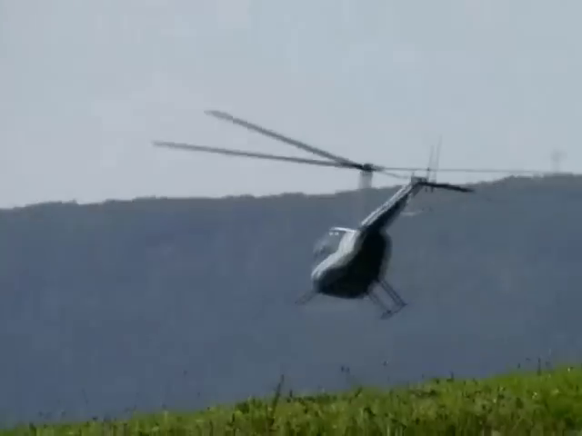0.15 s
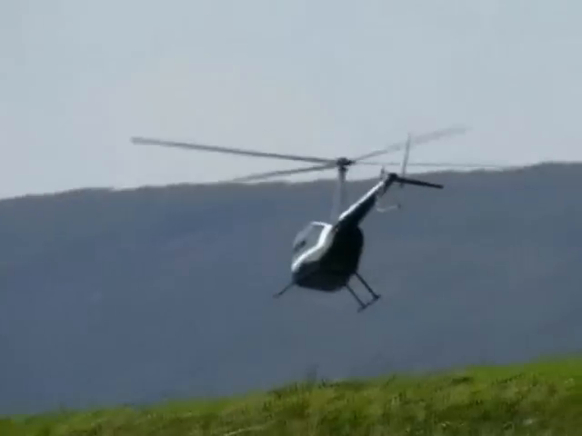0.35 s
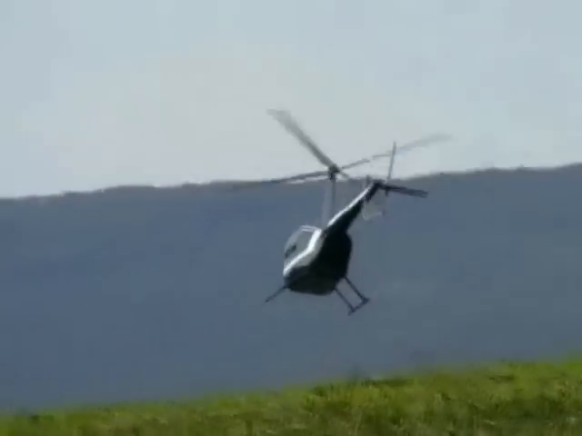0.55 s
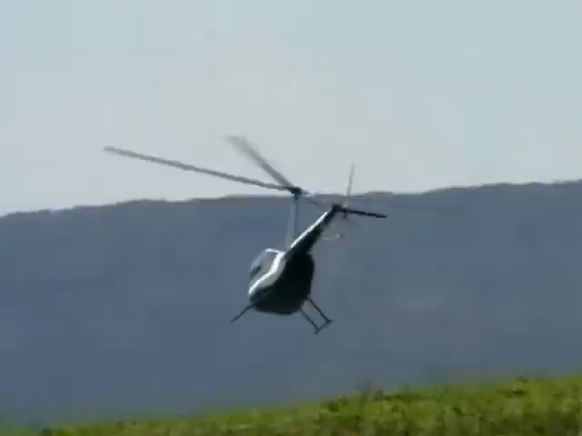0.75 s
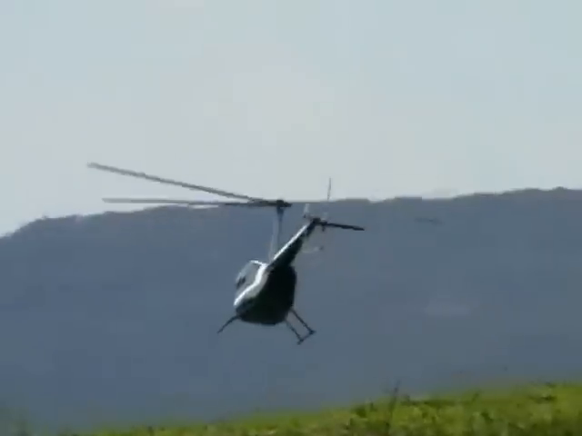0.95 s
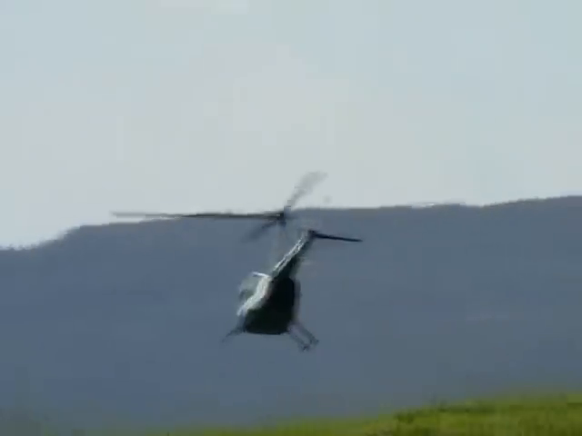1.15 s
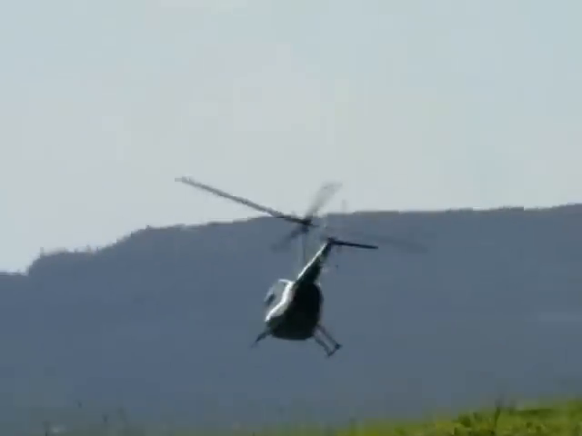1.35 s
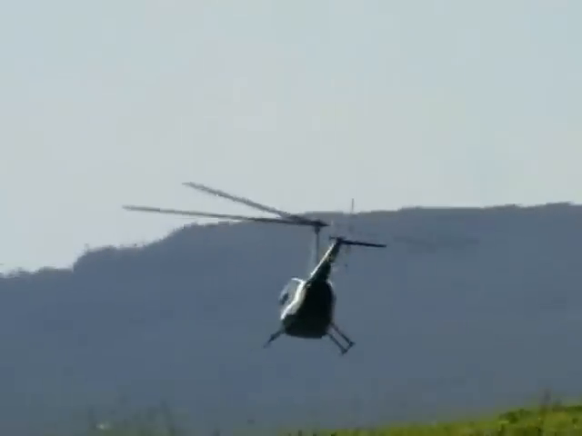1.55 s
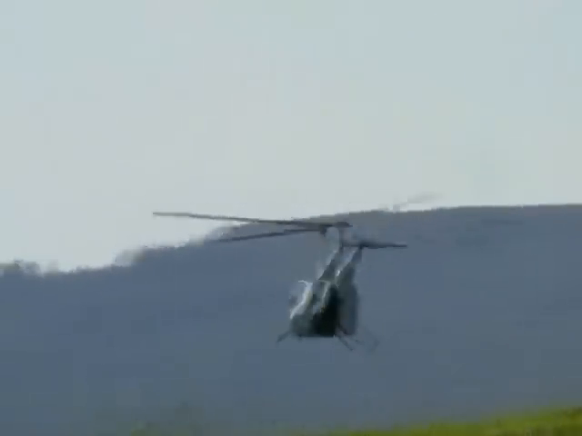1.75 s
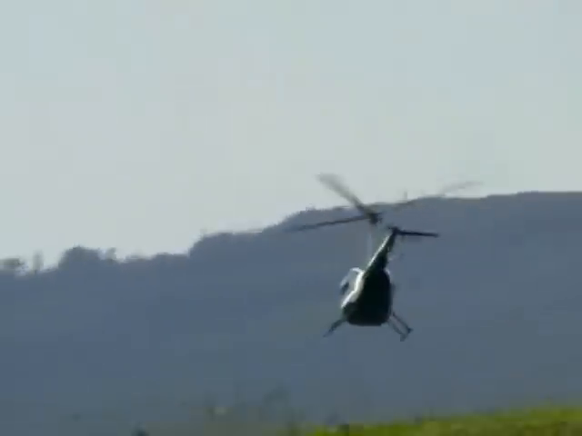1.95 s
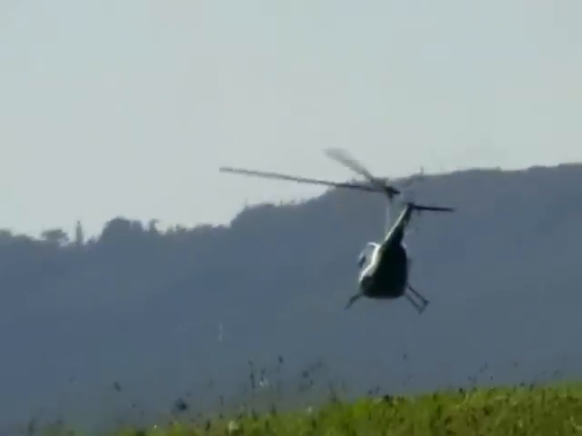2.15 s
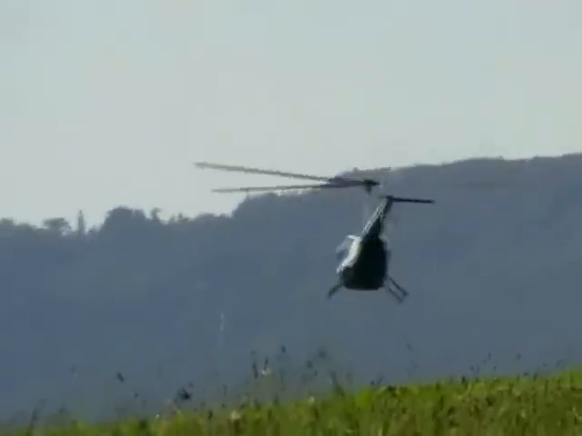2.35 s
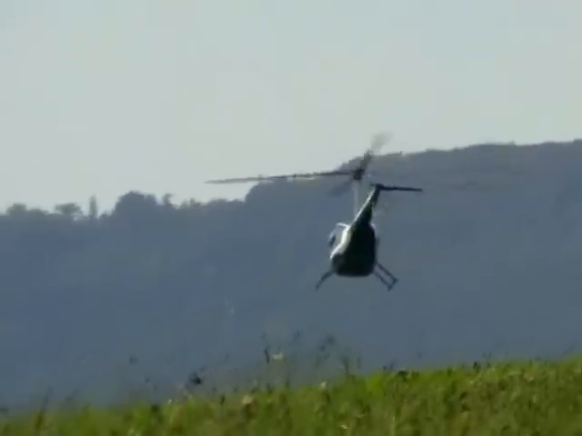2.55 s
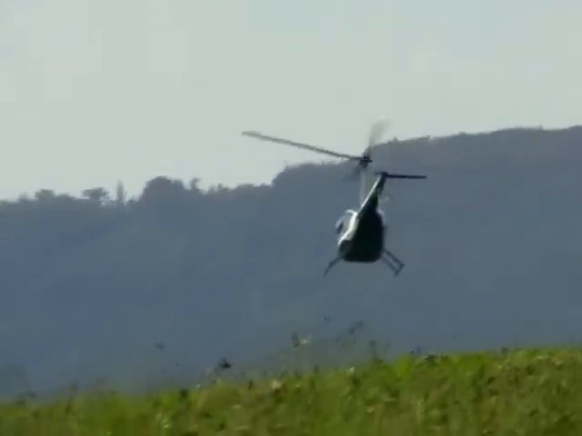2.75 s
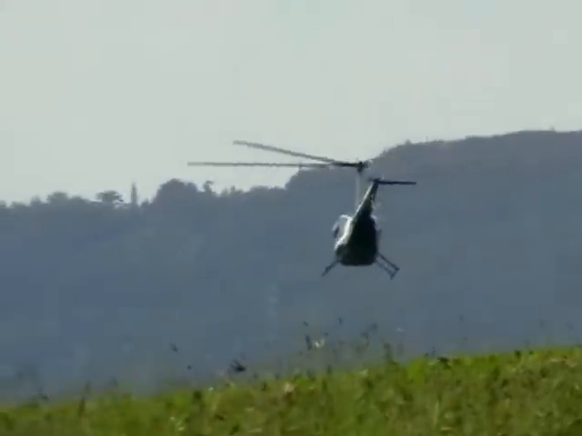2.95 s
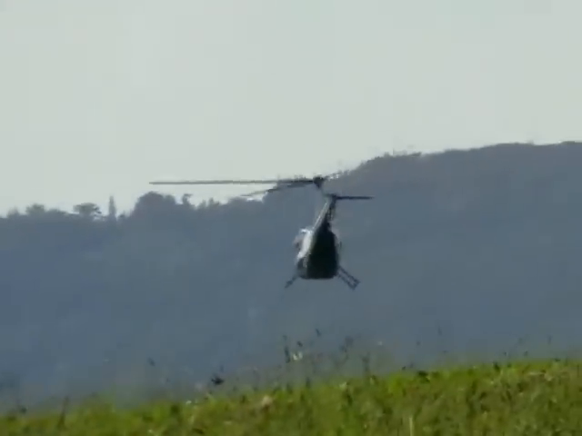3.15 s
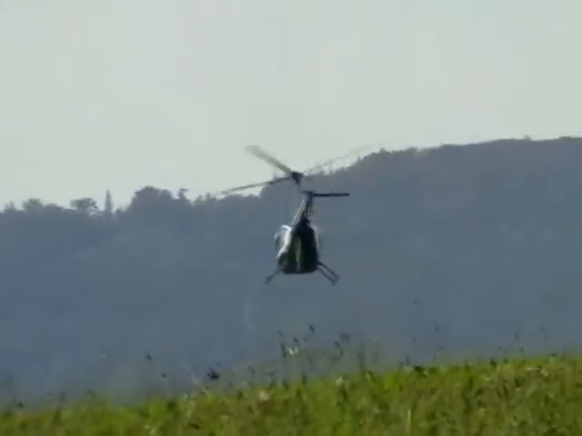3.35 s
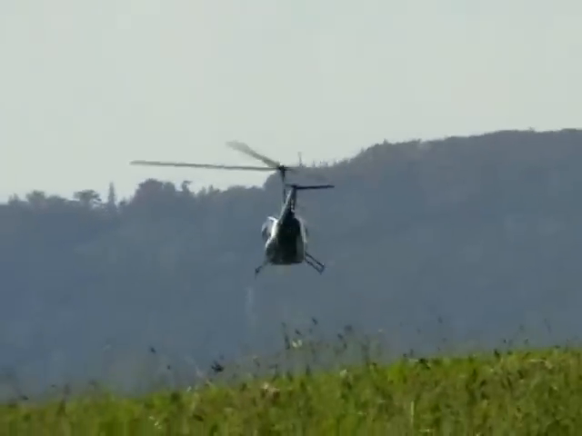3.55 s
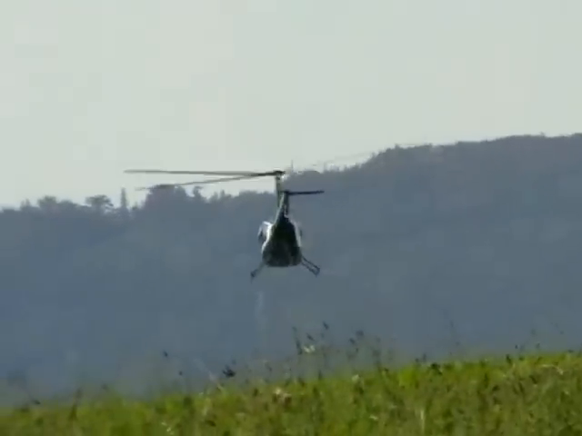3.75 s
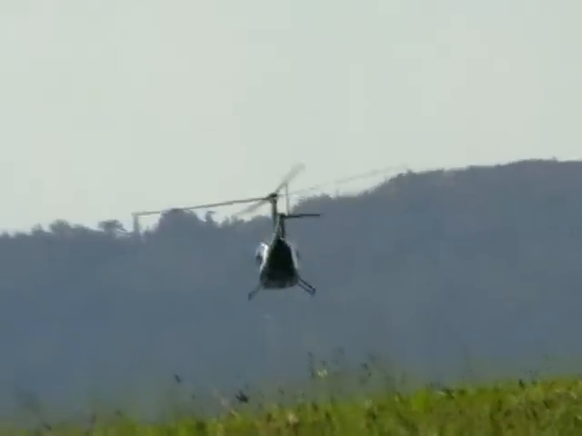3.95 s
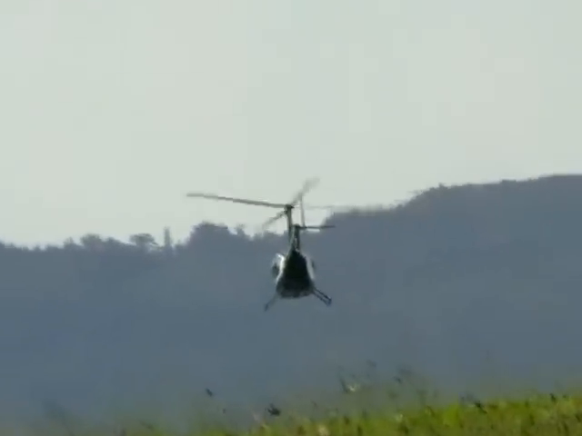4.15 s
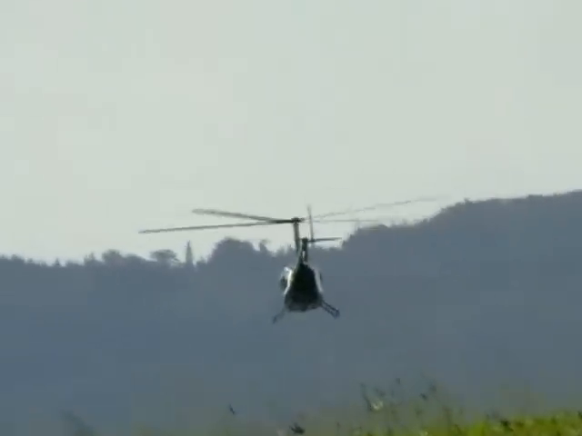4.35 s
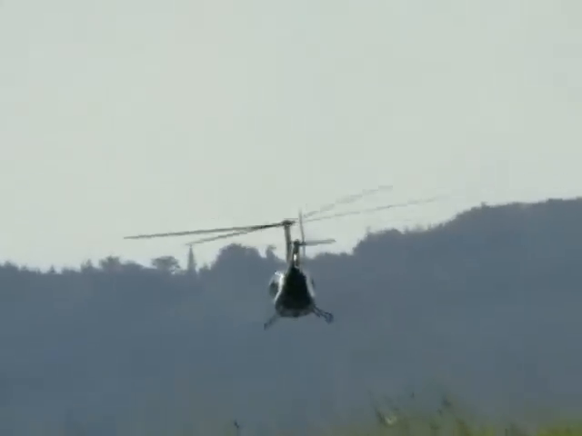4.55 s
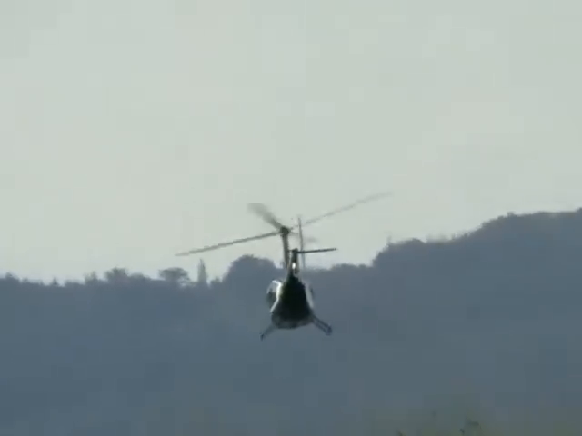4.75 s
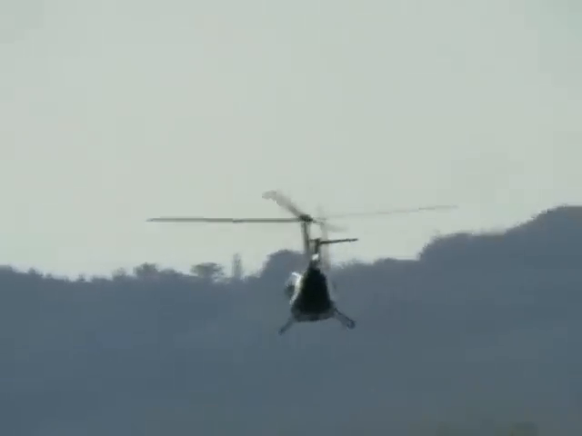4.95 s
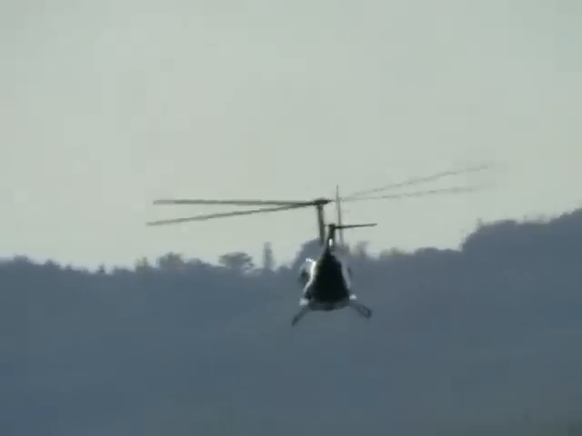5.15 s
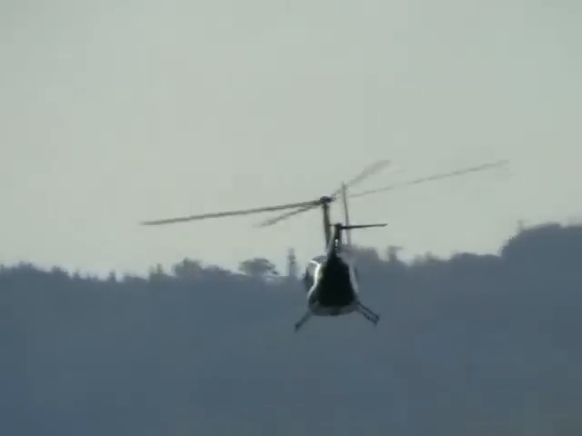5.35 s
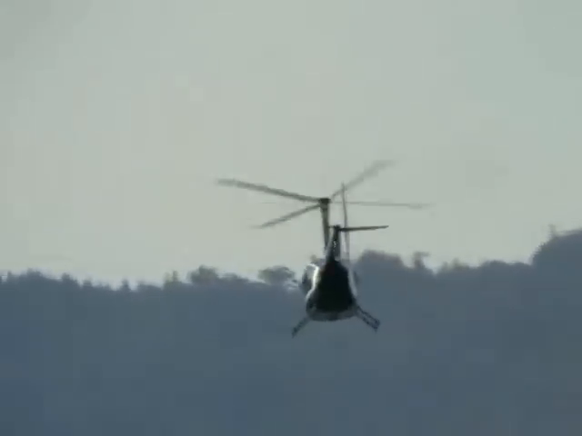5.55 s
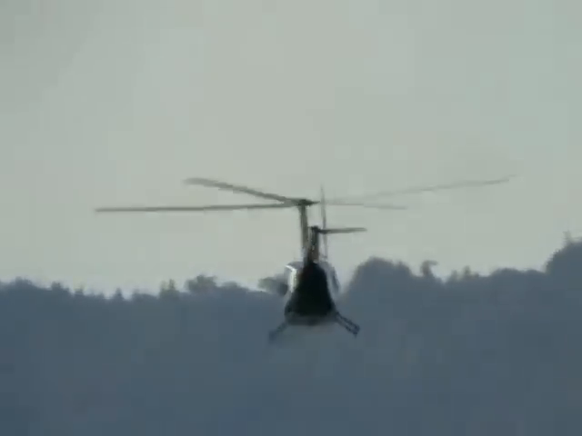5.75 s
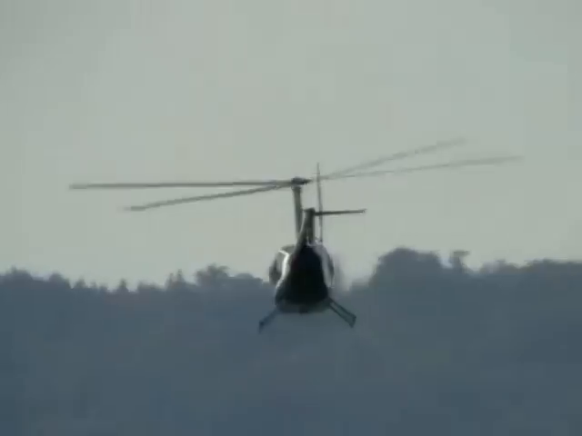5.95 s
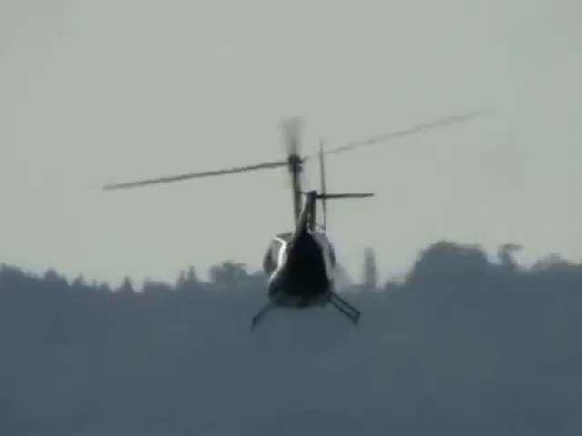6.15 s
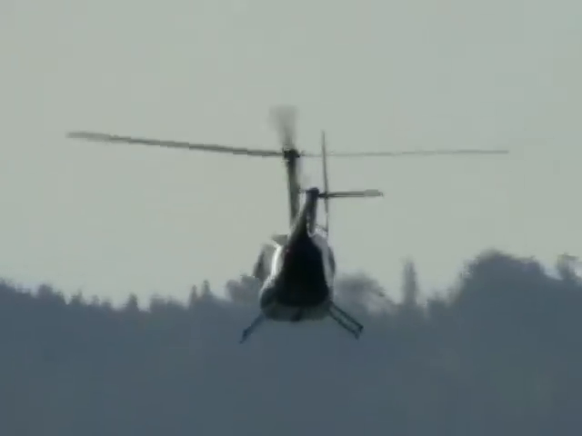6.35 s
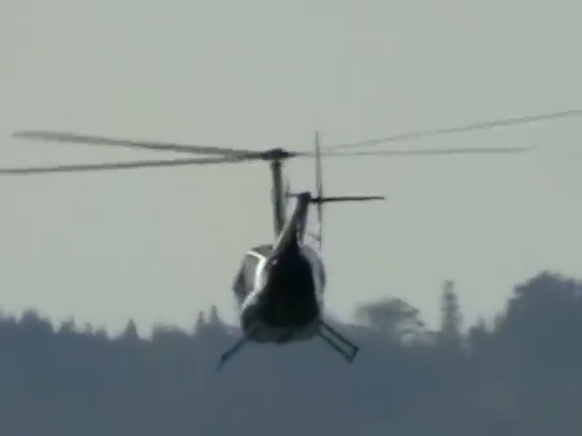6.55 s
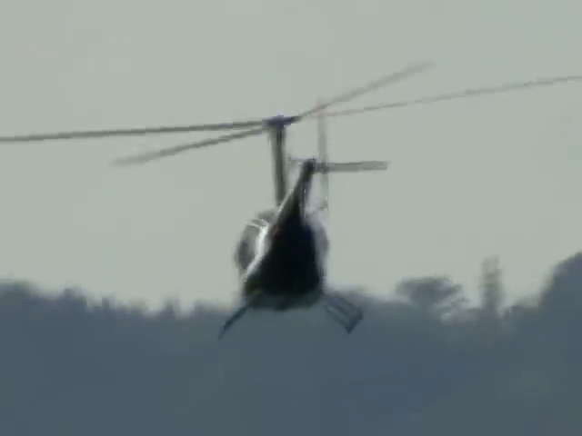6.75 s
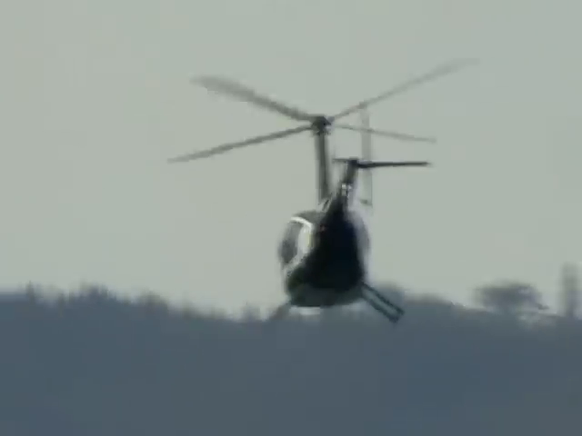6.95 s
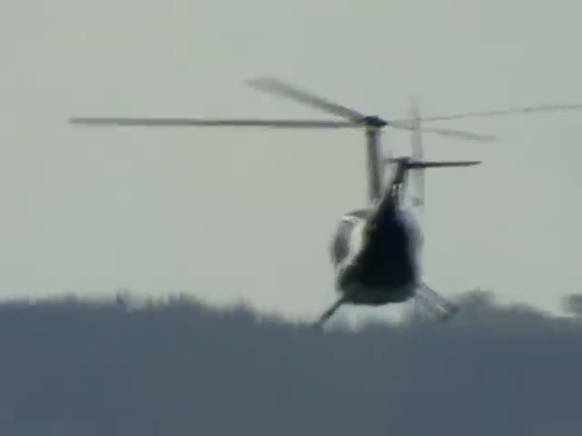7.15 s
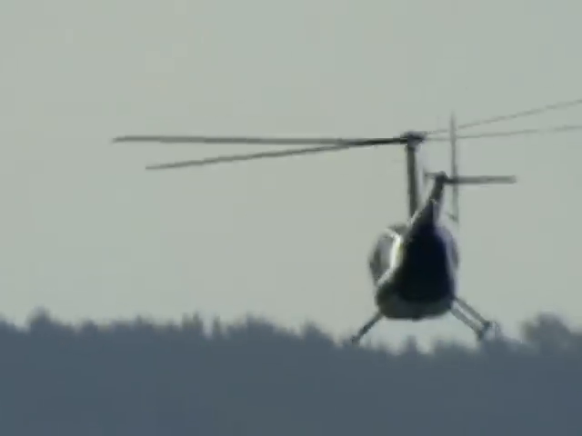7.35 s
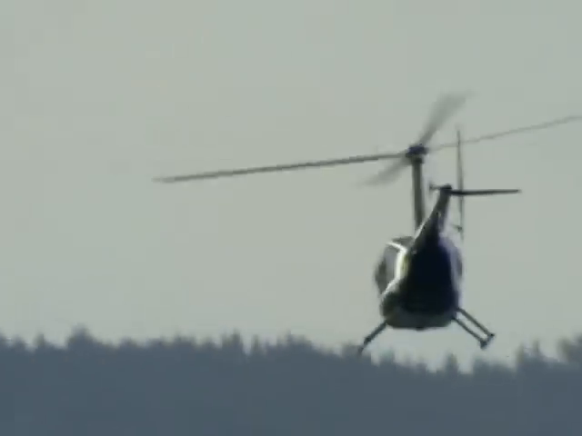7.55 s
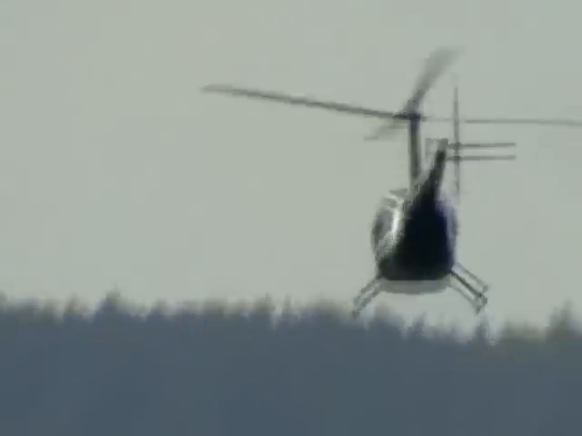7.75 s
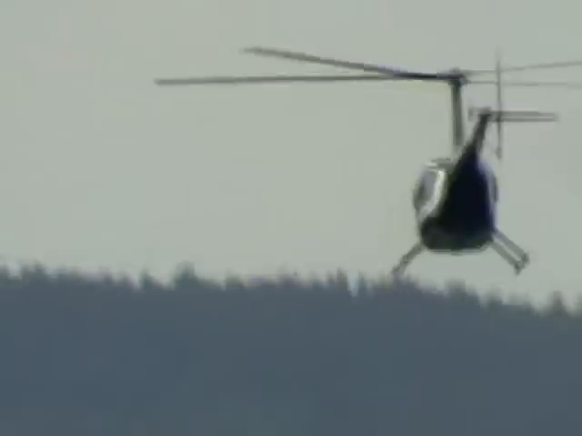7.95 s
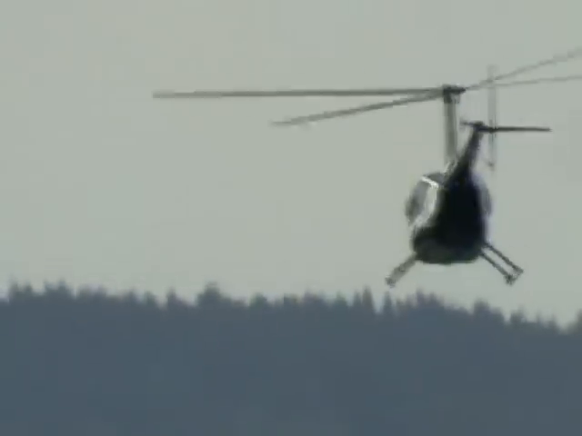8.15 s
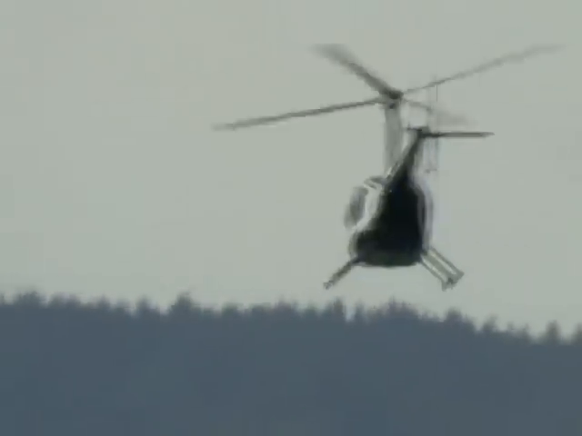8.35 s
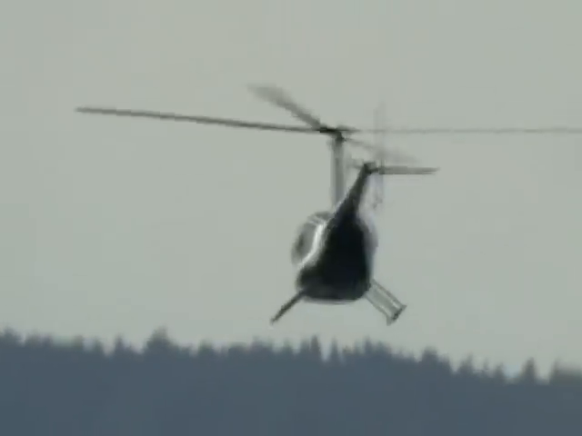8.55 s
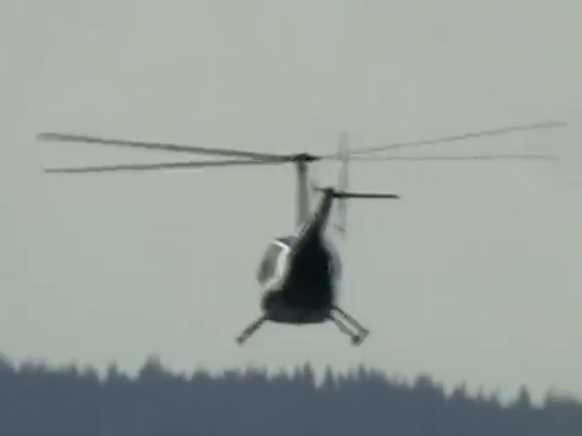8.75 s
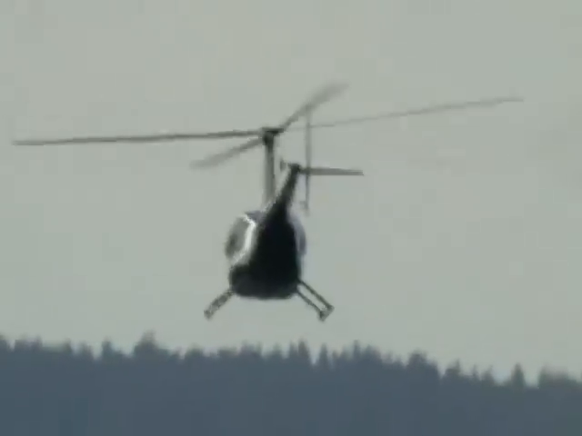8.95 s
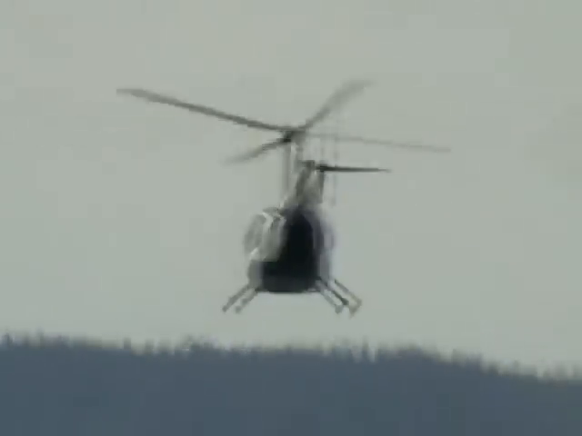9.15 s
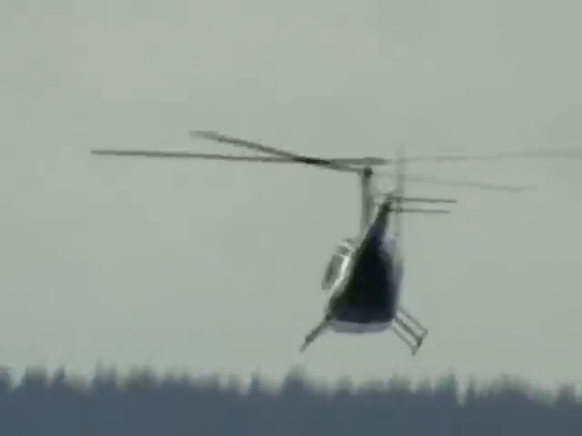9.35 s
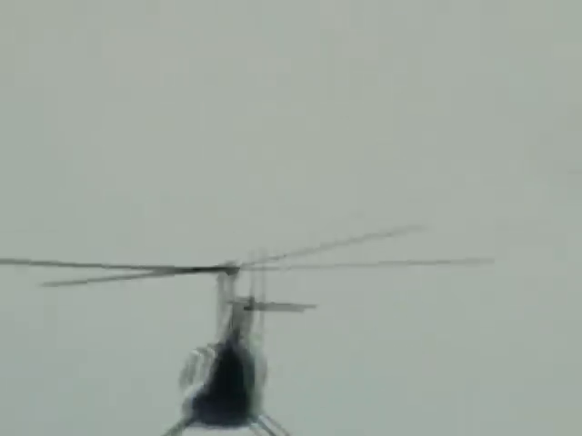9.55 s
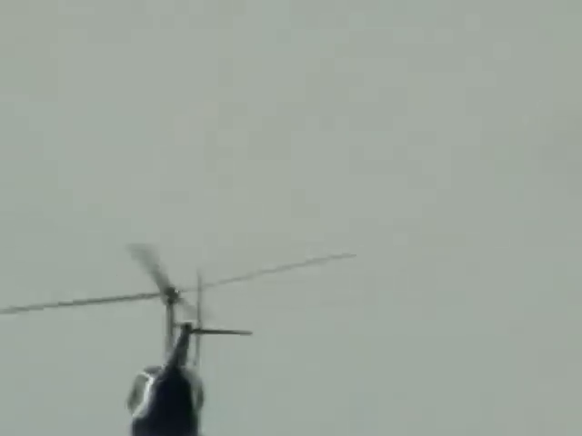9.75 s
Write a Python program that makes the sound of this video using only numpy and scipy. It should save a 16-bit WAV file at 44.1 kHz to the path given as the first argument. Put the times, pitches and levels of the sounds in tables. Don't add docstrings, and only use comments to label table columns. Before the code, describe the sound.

A small piston helicopter drones away low over a summer meadow, its throbbing, crackling exhaust hiss fading while grasshoppers buzz and rasp nearby.

```python
import sys
import numpy as np
from scipy import signal
from scipy.fft import rfft, irfft, next_fast_len
from scipy.io import wavfile
from scipy.ndimage import map_coordinates

SR = 44100
rng = np.random.default_rng(int(sys.argv[2]) if len(sys.argv) > 2 else 0)


def invert_db(x):
    u = np.asarray(x, float) / 20
    return 10 ** u


def unload_audio(sound):
    columns = np.transpose(np.atleast_2d(sound))
    steps = np.round(np.clip(columns, -1, 1) * 32767)
    wavfile.write(sys.argv[1], SR, steps.astype(np.int16))


N = 436575
TIME = np.arange(N) / SR


def in_time(rows):
    s, *columns = np.transpose(rows)
    return [np.interp(TIME, s, c) for c in columns]


def rms_one(x):
    return x / np.sqrt(np.mean(x ** 2) + 1e-20)


def band(x, low_hz, high_hz, order=2):
    edges_hz = [low_hz, min(high_hz, .45 * SR)]
    return signal.sosfilt(signal.butter(order, edges_hz, "band", fs=SR, output="sos"), x)


def band_noise(low_hz, high_hz):
    return rms_one(band(rng.standard_normal(N), low_hz, high_hz))


def coloured(spectrum):
    hz, level_db = np.transpose(spectrum)
    size = next_fast_len(N)
    log_hz = np.log(np.arange(size // 2 + 1) * SR / size + 1)
    shape = invert_db(np.interp(log_hz, np.log(hz), level_db, left=-80, right=-80))
    return rms_one(irfft(rfft(rng.standard_normal(size)) * shape, size)[:N])


def drift(points_per_s):
    points = rng.standard_normal(1200)
    return map_coordinates(points, [TIME * points_per_s], order=3, mode="wrap")


def resonate(x, modes):
    out = 0
    for k, (hz, width_hz, level_db) in enumerate(modes):
        r = np.exp(-np.pi * width_hz / SR)
        poles = [1, -2 * r * np.cos(2 * np.pi * hz / SR), r * r]
        zeros = [(1 - r * r) / 2, 0, (r * r - 1) / 2]
        out = out + (-1) ** k * invert_db(level_db) * signal.lfilter(zeros, poles, x)
    return out


def throb(turns, sharp, uneven_db):
    sizes = invert_db(uneven_db * rng.standard_normal(2000))
    size = sizes[np.floor(turns + .5).astype(int) % len(sizes)]
    return size * np.exp(sharp * (np.cos(2 * np.pi * turns) - 1))


def bursts(events, rise_s, fall_s):
    out = np.zeros(N)
    for s, peak_db in events:
        span = slice(int(s * SR), int((s + .1) * SR))
        t = np.clip(TIME[span] - s, 0, None)
        out[span] += invert_db(peak_db) * (1 - np.exp(-t / rise_s)) * np.exp(-t / fall_s)
    return out


# multiple of the engine cycle, dB re the drone when far, dB gained per dB of nearness.
MAIN_ORDERS = [(6, -0.5, 1.0), (9, -2.5, 0.93), (12, -1, 1.24)]
# multiple of the engine cycle, level in dB re the
WEAK_ORDERS_DB = [(3, -28), (4, -34), (7.12, -15), (8, -44), (10, -8.5), (11, -15), (13, -24), (14, -18),
                  (15, -19.5), (16, -28.5), (18, -29), (19, -23.5), (21, -26), (24, -30.5)]
# multiple of the engine cycle, level in dB re the low rush band.
PIPE_ORDERS_DB = [(30, -21), (33, -17), (36, -17), (39, -10), (47, -21), (51, -21)]


def drone(cycles, levels_db, pipe_db):
    mean_db = sum(levels_db) / 3
    orders = [(row[0], level_db) for row, level_db in zip(MAIN_ORDERS, levels_db)]
    orders += [(k, mean_db + 2.5 + level_db) for k, level_db in WEAK_ORDERS_DB]
    orders += [(k, pipe_db + level_db) for k, level_db in PIPE_ORDERS_DB]
    out = 0
    for k, level_db in orders:
        flip = np.pi * (k % 3) * (k // 3)
        pipe_delay = .85 * (k // 3) ** 2
        phase = 2 * np.pi * k * cycles + flip + pipe_delay + .014 * k * drift(5.0)
        out = out + np.sqrt(2) * invert_db(level_db + .06 * k * drift(8.0)) * np.sin(phase)
    return out


# frequency in Hz, level in dB per Hz.
WASH_COLOUR = [(25, -9), (50, -6), (75, 5), (110, 6), (200, 10), (290, 6.5), (350, 4), (700, -4)]


def rotor_wash(drone_db):
    return invert_db(0.61 * (drone_db + 58.5) - 63.0) * coloured(WASH_COLOUR)


RUSH_EDGES_HZ = [520, 1200, 1680, 2480, 5000]
# frequency in Hz, width in Hz, level in dB.
RUSH_MODES = [
    [(667, 145, -1.5), (848, 112, 0), (1035, 142, -2)],
    [(1405, 180, 0)],
    [(1653, 165, 5.5), (2167, 420, 3.5)],
    [(2823, 290, 2.5), (3590, 134, -2), (4060, 280, -5), (4750, 74, -22)],
]
# start in seconds, peak in dB.
BACKFIRES = [(0.0338, -29), (0.0972, -33), (0.2603, -31), (0.3521, -33), (0.399, -32), (0.4469, -30),
             (0.5132, -34), (0.7193, -31), (0.8639, -31), (0.8964, -27), (0.9120, -25), (1.039, -31),
             (1.0884, -30), (1.1672, -33), (1.2486, -32), (1.5204, -35), (1.7619, -36), (1.8113, -36),
             (1.8577, -37), (2.0023, -35), (2.1465, -38), (3.5508, -40), (3.9399, -33), (4.0362, -37),
             (6.8192, -34), (7.0454, -39), (7.3372, -34), (7.434, -39), (7.6301, -37)]
# start in seconds, peak in dB.
SLAPS = [(0.2909, -28), (0.3744, -27), (0.4519, -27), (0.5399, -27), (0.615, -26), (0.698, -29),
         (0.7675, -28), (0.8175, -26), (1.1051, -26), (1.2975, -29), (1.4416, -31.5)]


def rush(cycles, bands_db):
    near_bank = throb(3 * cycles, sharp=3.0, uneven_db=2.5)
    both_banks = throb(6 * cycles, sharp=1.5, uneven_db=3.0)
    puffs = .45 + 1.1 * near_bank + .25 * both_banks
    blades = invert_db(1.0 * np.cos(2 * np.pi * 0.53 * cycles) + 0.2 * drift(6.0))
    white = rng.standard_normal((2, N))
    gate_depths = [0.18, 0.33, 0.56, 0.57]
    out = 0
    for k, level_db in enumerate(bands_db):
        gate = (puffs * blades) ** gate_depths[k] * invert_db(1.08 * drift(12.0))
        rung = resonate(gate * white[k % 2], RUSH_MODES[k])
        out = out + invert_db(level_db + 1.5) * rms_one(band(rung, *RUSH_EDGES_HZ[k:k + 2], order=1))
    pipe_tone = np.sin(2 * np.pi * np.cumsum(2050 + 90.0 * drift(30.0)) / SR)
    pipe = pipe_tone + .3 * rms_one(band(white[1], 1700, 2450))
    out += invert_db(5.5) * bursts(BACKFIRES, rise_s=.0004, fall_s=.003) * pipe
    slap = resonate(white[0], RUSH_MODES[3][1:3]) + 0.34 * band(white[1], 2000, 4000)
    return out + invert_db(-3.5) * bursts(SLAPS, rise_s=0.002, fall_s=0.007) * rms_one(slap)


def ground(x):
    echo_s, echo_share = 0.001423, 0.16
    return x + echo_share * np.interp(TIME - echo_s, TIME, x)


# time in seconds, rate in Hz.
FIRING_HZ = [(0, 125.25), (1.1, 124.87), (2.3, 124.42), (2.9, 124.0), (3.5, 123.6), (4.9, 123.75),
             (6.5, 123.45), (8.0, 123.3), (9.9, 123.1)]
# time in seconds, drone in dB, rush in dB, brightness in dB as exhaust and wind turn to the ear.
FLIGHT = [(0.0, -44, -41, 2.5), (0.35, -44, -43, -1), (0.62, -44.5, -41, -4.5), (0.98, -45.5, -43, 4.5),
          (1.3, -47.5, -43, -1), (1.62, -47, -45.5, -2.5), (1.85, -47.5, -47.5, 3),
          (2.25, -48.5, -48, -0.5), (2.8, -49, -54, -0.5), (3.35, -50, -52, 0), (4.05, -50.5, -51, 1),
          (4.65, -51, -52, -2.5), (5.15, -53.5, -53.5, 1.5), (5.6, -52.5, -57, 2.5), (6.5, -52.5, -56.5, 3),
          (7.65, -54.5, -56.5, 6.5), (8.4, -54.5, -58.5, -2.5), (9.9, -54, -58.5, -4)]
# dB re the rush when far, dB gained per dB of nearness, dB per dB of brightness,
# patchiness in dB.
RUSH_BANDS = [(0, 1.0, -0.04, 0.04), (-4, 1.12, 0.58, 1.0), (0.5, 1.0, 1.0, 1.5), (-9.5, 1.4666, 0.97, 1.0)]


def helicopter():
    far_drone_db, far_rush_db = -54, -57
    firing_hz, = in_time(FIRING_HZ)
    drone_db, rush_db, bright_db = in_time(FLIGHT)
    cycles = np.cumsum(firing_hz) / 6 / SR
    drone_near_db, rush_near_db = drone_db - far_drone_db, rush_db - far_rush_db
    levels_db = [far_drone_db + far_db + gain * drone_near_db + 1.2 * drift(4.0)
                 for _, far_db, gain in MAIN_ORDERS]
    bands_db = [far_rush_db + far_db + gain * rush_near_db + share * bright_db + patchy_db * drift(7.0)
                for far_db, gain, share, patchy_db in RUSH_BANDS]
    pipe_db = rush_db + np.interp(TIME, [1.8, 3.0], [0, -7])
    engine = drone(cycles, levels_db, pipe_db) + rotor_wash(sum(levels_db) / 3)
    return engine + invert_db(-5.0) * ground(rush(cycles, bands_db))


# time in seconds, strokes per second.
STROKES_PER_S = [(1.3, 49.4), (1.8, 49.85), (2.35, 49.85), (2.7, 48.2), (3.0, 47.0)]
# time in seconds, level in dB.
BUZZ_DB = [(.7, -57), (1.25, -50), (1.9, -47), (2.3, -45), (2.95, -44.5)]
# frequency in Hz, width in Hz, level in dB.
WING_MODES = [(4360, 508, -14), (8420, 360, -2.5), (9240, 410, -10), (10500, 480, -12.5),
              (12700, 440, -18.5)]


def grasshopper():
    end_s = 3.134
    (per_s,), (level_db,) = in_time(STROKES_PER_S), in_time(BUZZ_DB)
    turns = np.cumsum(per_s) / SR
    turns -= np.interp(end_s - .012, TIME, turns)
    stroke = throb(turns, sharp=1.9, uneven_db=1.0)
    tooth_tone = np.sin(2 * np.pi * np.cumsum(8420 + 170 * drift(120.0)) / SR)
    teeth = .6 * rng.standard_normal(N) + .12 * tooth_tone
    singing = np.interp(TIME, [.4, .9, end_s, end_s + .003], [0, 1, 1, 0])
    return invert_db(level_db - 5.5) * singing * rms_one(resonate(stroke * teeth, WING_MODES))


def bush_cricket():
    start_s, start_per_s, slowing_per_s2 = 6.62, 98.2, 2.6
    per_s = start_per_s - slowing_per_s2 * (TIME - start_s)
    level_db = -60.3 + .5 * drift(2.85)
    turns = np.cumsum(per_s * (1 + 0.024 * drift(40.0))) / SR
    since_s = TIME - np.interp(np.round(turns), turns, TIME)
    pitch_hz = 13850 + 170 * rng.standard_normal(1200)[np.round(turns).astype(int)]
    slide = np.sin(2 * np.pi * (pitch_hz * since_s - 4.5e5 * since_s ** 2))
    edge = 0.5 * band_noise(8960, 16000) + 0.24 * band_noise(13700, 15800)
    tick = rms_one(throb(turns, sharp=8.0, uneven_db=1.5) * (slide + edge))
    return invert_db(level_db) * tick * np.interp(TIME, [start_s, start_s + 0.051], [0, 1])


# first syllable in seconds, last syllable in seconds, syllables per second.
SONGS = [
    (3.24, 4.335, 9.1),
    (4.445, 5.73, 9.35),
    (8.365, 9.495, 8.88),
]
SONG_DB = [-57.5, -60.5, -57]


def songs():
    out = 0
    for (first_s, last_s, per_s), level_db in zip(SONGS, SONG_DB):
        turns = (TIME - first_s) * per_s
        turns = turns - .08 * (np.cos(2 * np.pi * turns) - 1)
        singing = np.interp(TIME, [first_s - .07, first_s - .04, last_s + .02, last_s + .04], [0, 1, 1, 0])
        syllables = throb(np.clip(turns, 0, None), sharp=2.0, uneven_db=1.5) * (turns > 0)
        lead_in = (turns <= 0) * np.exp(turns * 4)
        out = out + invert_db(level_db) * singing * (.3 + syllables + lead_in)
    return out


# time in seconds, rasp in dB.
CHORUS_DB = [(0, -59.5), (.8, -56), (1.8, -59.5), (3.1, -60), (3.9, -57.5), (4.5, -57), (5.4, -58),
             (5.85, -60), (6.3, -57.5), (6.8, -60), (7.6, -57), (8.3, -55), (8.8, -54.5), (9.3, -58),
             (9.9, -56.5)]
# frequency in Hz, level in dB per Hz.
CHORUS_COLOUR = [(2530, -22), (4300, -15), (4700, -8), (5740, 0.5), (7050, 2.5), (10000, -9.5),
                 (13000, -33), (22000, -120)]


def chorus():
    crowd_edge_db, song_edge_db = -7.5, -1
    crowd = invert_db(in_time(CHORUS_DB)[0] + 0.37 * drift(9.0))
    singer = songs()
    turns = np.cumsum(46.0 + 5.0 * drift(3.0)) / SR
    strokes = .8 + .7 * throb(turns, sharp=2.2, uneven_db=2.5)
    strokes = rms_one(strokes * invert_db(1.2 * drift(110.0)))
    edge = band_noise(7500, 12900)
    rasp_gain = invert_db(1.0) * np.hypot(crowd, singer)
    edge_gain = invert_db(-3.5) * np.hypot(invert_db(crowd_edge_db) * crowd, invert_db(song_edge_db) * singer)
    return strokes * (rasp_gain * coloured(CHORUS_COLOUR) + edge_gain * edge)


# start in seconds, length in seconds, first pitch in Hz, last pitch in Hz, level in dB.
BIRD = [
    (8.101, 0.042, 4300, 4510, -61),
    (8.18, .045, 4300, 4600, -58),
    (8.99, .15, 5900, 3200, -59),
    (9.53, .16, 5200, 2900, -63),
]


def bird():
    notes_per_s, rising_glide_hz, falling_glide_hz = 42.5, 1964, -250
    out, hoarse = np.zeros(N), band_noise(60, 410)
    for s, length_s, first_hz, last_hz, level_db in BIRD:
        glide_hz = rising_glide_hz if last_hz > first_hz else falling_glide_hz
        t = np.arange(int(length_s * SR)) / SR
        note = t * notes_per_s % 1
        pitch_hz = first_hz + (last_hz - first_hz) * t / length_s + glide_hz * (note - .5)
        shape = np.sin(np.pi * note) ** 2 * np.sin(np.pi * t / length_s) ** 0.33
        start = int(s * SR)
        out[start:start + len(t)] += 2 * invert_db(level_db) * shape * np.sin(2 * np.pi * np.cumsum(pitch_hz) / SR)
    out = out * (.7 + .7 * hoarse)
    return out + .45 * np.interp(TIME - .037, TIME, out) + .3 * np.interp(TIME - .011, TIME, out)


def handling():
    click_s, click_db = 6.770, -40
    puff_s, puff_db = 4.15, -38
    body = bursts([(click_s, click_db)], rise_s=.0003, fall_s=.003) * band_noise(1800, 7900)
    snap = band(bursts([(click_s + .001, click_db + 11)], rise_s=.00002, fall_s=.00004), 1800, 7000)
    gust, aside = band(rng.standard_normal((2, N)), 80, 348, order=3)
    wind = rms_one(gust) + .2 * rms_one(aside) * [[1], [-1]]
    return body + snap + bursts([(puff_s, puff_db)], rise_s=.015, fall_s=.025) * wind


# frequency in Hz, level in dB per Hz.
AIR_COLOUR = [(300, -8.5), (1000, 9), (2500, 1.5), (4500, -5), (8000, 2), (11000, -7), (13000, -5.5),
              (16500, -8)]
# time in seconds, level in dB.
AIR_DB = [(0, -53), (3, -54), (4.4, -54.5), (5.2, -56.5), (6.5, -54), (9.9, -55.5)]


def far_air():
    return invert_db(in_time(AIR_DB)[0]) * coloured(AIR_COLOUR)


def scene():
    middle = helicopter() + bush_cricket() + chorus() + bird() + far_air()
    buzz = grasshopper()
    side = invert_db(-19.5) * band(buzz, 8930, 10800)
    return middle + buzz + handling() + side * [[1], [-1]]


def band_limit(x):
    return signal.sosfilt(signal.butter(12, 15970, fs=SR, output="sos"), x)


def record(dry):
    steep = signal.ellip(10, .3, 50, 15740, fs=SR, output="sos")
    return band_limit(signal.sosfilt(steep, dry))


dry = scene()
out = record(dry)
unload_audio(out)
```